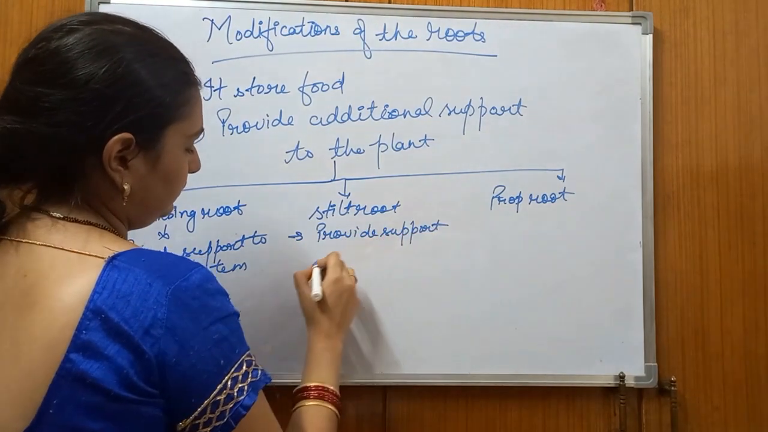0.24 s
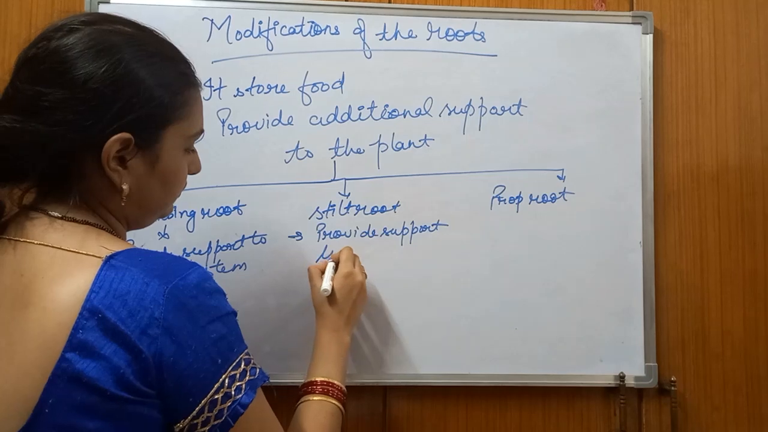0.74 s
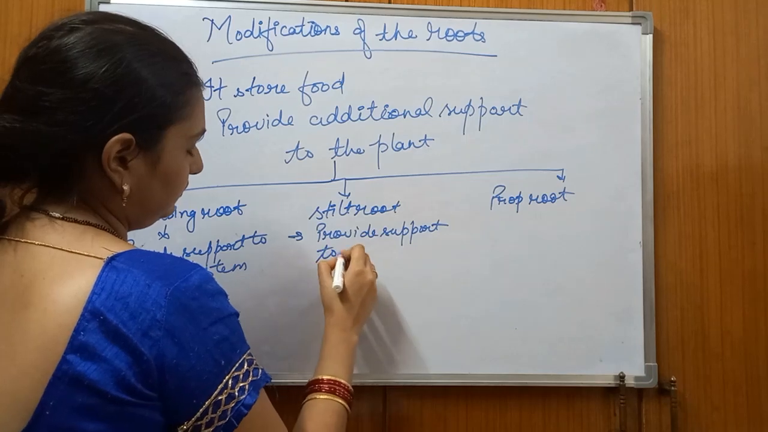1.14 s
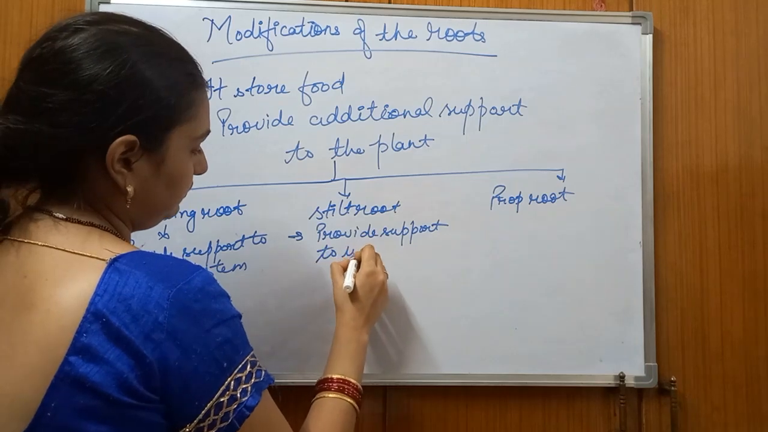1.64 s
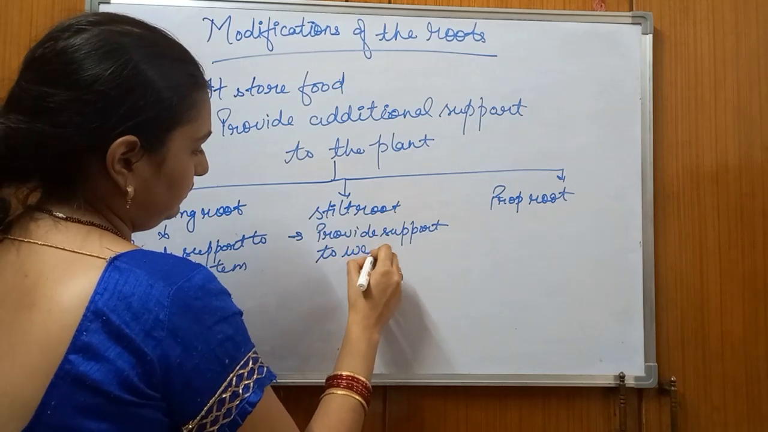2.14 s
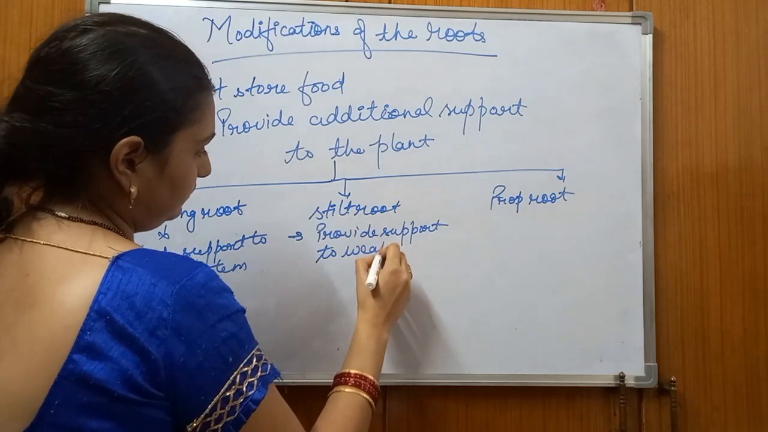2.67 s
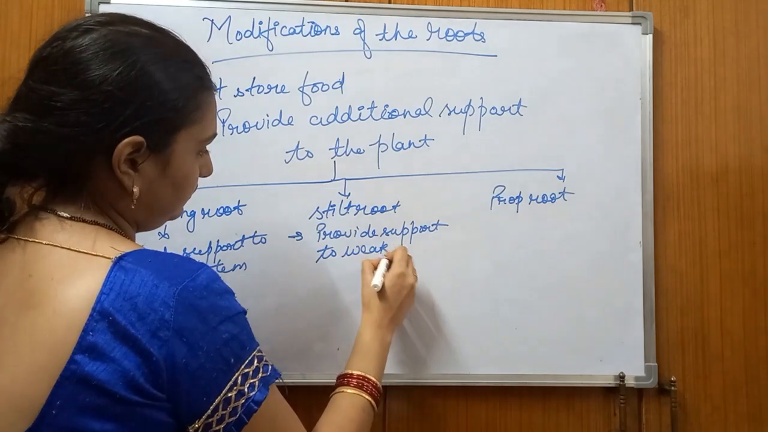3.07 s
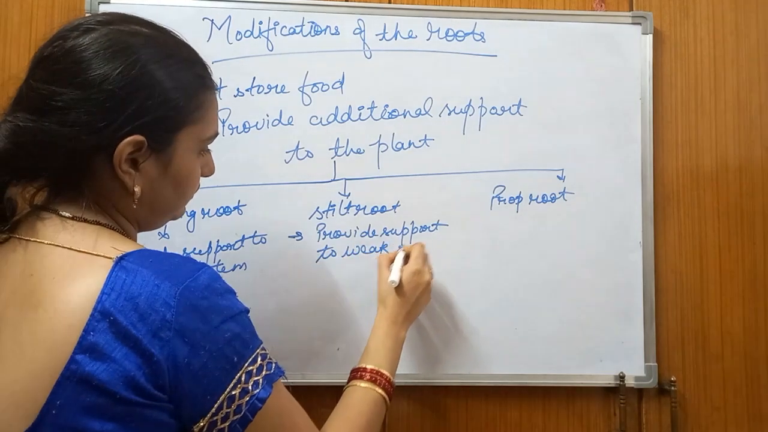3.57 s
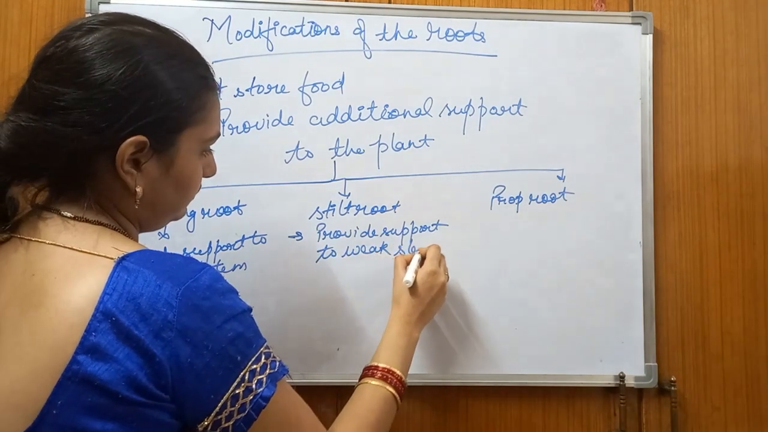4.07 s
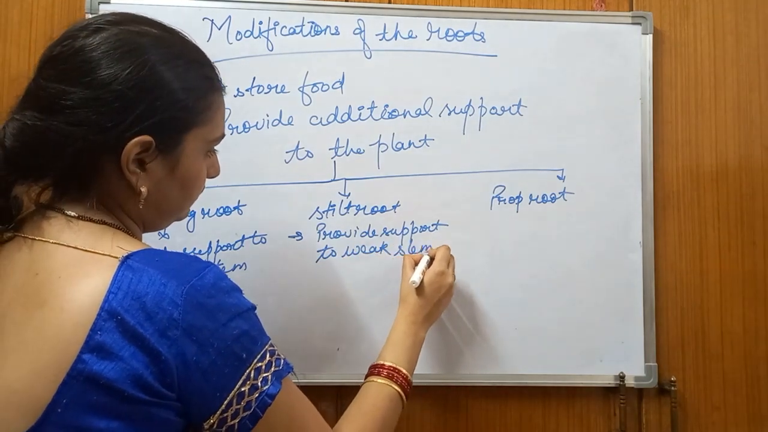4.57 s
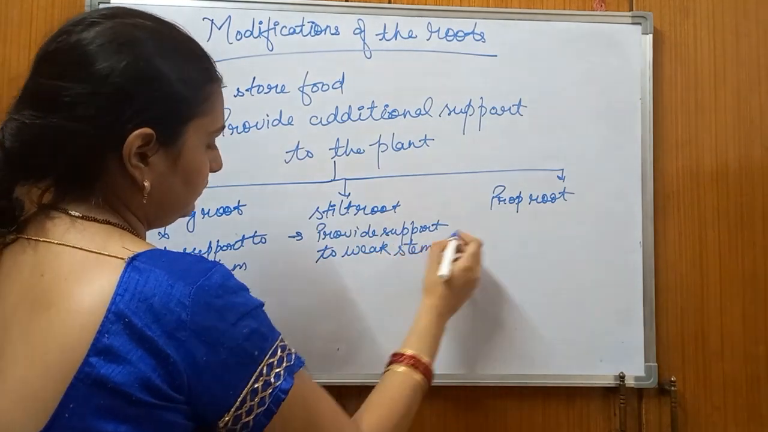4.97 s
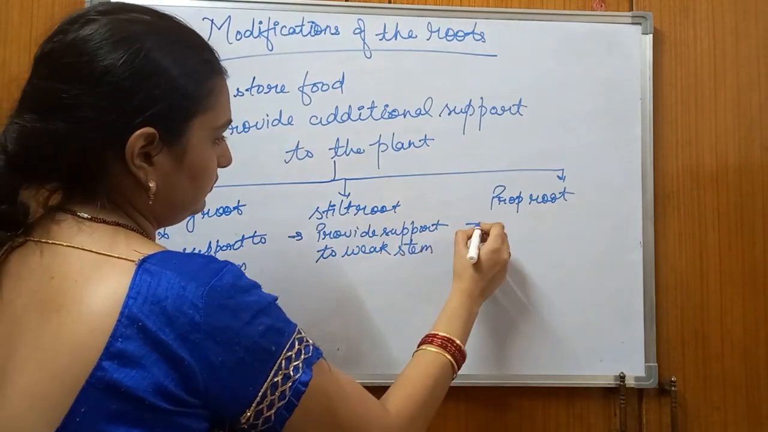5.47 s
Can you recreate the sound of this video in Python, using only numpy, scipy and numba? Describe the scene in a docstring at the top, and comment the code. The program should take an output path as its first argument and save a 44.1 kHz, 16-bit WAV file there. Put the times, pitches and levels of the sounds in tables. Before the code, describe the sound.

A felt-tip marker scratches short, hoarse, squeaky strokes on a whiteboard, with soft panel thumps, brief bangle clicks and a low fan drone.

```python
"""A felt marker writes a few words on a wall-hung whiteboard in a small bare room, the microphone close by.
The nib lands with a soft thump: a smooth push drives the panel's modes, frame returns and boom.
Then it scratches in tiny random slips that ring the nib, the barrel and the panel; a faint tone whines early on.
Bangles click as bursts of noise through resonances, and cloth rustles when the arm travels.
Behind it all a fan drones, shaped noise and wavering tones, over faint microphone hiss."""
import sys
import numpy as np
from scipy import signal
from scipy.fft import rfft, irfft
from scipy.io import wavfile
from scipy.ndimage import uniform_filter1d, map_coordinates
from numba import njit

SR = 44100
rng = np.random.default_rng(int(sys.argv[2]) if len(sys.argv) > 2 else 0)


def generate_wav(signal):
    """Clip the signal to [-1, 1] and save it as 16-bit WAV at the path in sys.argv[1]."""
    frames = np.transpose(np.atleast_2d(signal))
    scaled = np.clip(frames, -1, 1) * 32767
    pcm = np.round(scaled).astype(np.int16)
    wavfile.write(sys.argv[1], SR, pcm)


N = 252252
T = np.arange(N) / SR  # time [s]
FREQS = np.arange(N + 1) * SR / (2 * N)  # bins of the zero-padded spectrum [Hz]
TOP_HZ = 15850  # upper limit of the microphone


def undb(db):
    """Decibels to gain."""
    return np.exp(np.asarray(db) * (np.log(10) / 20))


def unit(x):
    """Scale to rms 1."""
    return x / np.sqrt(np.mean(x ** 2))


def noise():
    """White noise over the whole scene."""
    return rng.standard_normal(N)


def shape(x, response):
    """Filter by a frequency response."""
    return irfft(rfft(x, 2 * N) * response)[:N]


def colour(x, points):
    """Filter by a (frequency [Hz], level [dB]) spectrum, then scale to rms 1."""
    hz, db = np.transpose(points)
    curve_db = np.interp(np.log(FREQS + 1), np.log(hz), db)
    return unit(shape(x, undb(curve_db)))


def resonance(hz, width):
    """Response of one damped resonance, gain 1 at the centre."""
    return 1j * FREQS * width / (hz ** 2 - FREQS ** 2 + 1j * FREQS * width)


def ring(x, modes):
    """Pass through parallel (frequency [Hz], width [Hz], level [dB]) resonances."""
    return shape(x, sum(undb(db) * resonance(hz, width) for hz, width, db in modes))


@njit
def sweep(x, hz, width):
    """Band-pass whose centre moves: a state-variable filter retuned at every sample."""
    out, band_state, low_state = np.empty(len(x)), 0., 0.
    for i in range(len(x)):
        g, damping = np.tan(np.pi * hz[i] / SR), width / hz[i]
        band = (band_state + g * (x[i] - low_state)) / (1 + g * (g + damping))
        band_state = 2 * band - band_state
        low_state = low_state + 2 * g * band
        out[i] = damping * band
    return out


def walk(rate):
    """Smooth random wander of rms 1, with about `rate` fresh values a second."""
    step = int(SR / rate)
    held = np.repeat(rng.standard_normal(N // step + 1), step)
    return unit(uniform_filter1d(uniform_filter1d(held, step), step)[:N])


def slips(rate, spread_db):
    """Random tiny clicks of uneven size, on average `rate` a second, scaled to rms 1."""
    clicks = (rng.random(N) < rate / SR) * noise()
    return unit(clicks * undb(spread_db * np.clip(noise(), -2, 2)))


def fade(t60, start=0):
    """Exponential decay from a start time, cut off after twice its t60."""
    out, live = np.zeros(N), (T >= start) & (T < start + 2 * t60)
    out[live] = np.exp(-np.log(1000) * (T[live] - start) / t60)
    return out


def convolve(x, response):
    """Play a sound through the first second of an impulse response."""
    return signal.fftconvolve(x, response[:SR])[:N]


def wavering_sine(hz, depth, rate):
    """Sine whose pitch wanders by a share `depth`."""
    return np.sin(2 * np.pi * np.cumsum(hz * (1 + depth * walk(rate))) / SR)


def shimmer(x, rate, depth_db, count=22):
    """Overlapping bands swell and sink on their own as the nib turns; rms 1."""
    centres, spectrum = np.linspace(0, TOP_HZ, count), rfft(x)
    total = np.zeros(N)
    for pick in np.eye(count):
        band = irfft(spectrum * np.interp(FREQS[::2], centres, pick), N)
        total += band * undb(depth_db * np.tanh(walk(rate)))
    return unit(total)


# Sweeps of the pen, levels before the mix in writing(): (start [s], length [s],
# fastest point [share of length], scratch [dB], barrel ring [dB], panel drag [dB],
# nib resonance [Hz], squeak re scratch [dB])
PEN_SWEEPS = [ (0.307, 0.08, 0.33, -59.5, -73, -83, 9500, -11),
              (0.375, 0.074, .35, -59.5, -76, -77, 9900, -2), (0.47, 0.12, 0.28, -61, -73.5, -80, 9600, -8),
              (0.562, 0.056, 0.73, -60, -68, -84, 7810, -1),
              (0.610, 0.061, 0.68, -56, -66.5, -69, 9900, -1),
              (0.693, 0.068, .14, -58.5, -68, -70.5, 9700, -2),
              (0.764, 0.071, 0.88, -59, -57, -68.5, 9900, -3),
              (0.815, 0.06, 0.14, -57.5, -65.5, -61.5, 10250, 5),
              (1.015, 0.065, .28, -60.5, -69.5, -83, 9300, -14),
              (1.24, .110, 0.41, -60.5, -68, -72, 9700, -4),
              (1.372, 0.13, 0.28, -63, -69, -71.5, 8200, -14),
              (1.473, 0.099, .55, -62.5, -62, -63.5, 7880, -16),
              (1.585, 0.069, 0.22, -64, -65, -66, 7900, -7),
              (1.658, 0.14, 0.64, -58.5, -60, -65.5, 10300, -14),
              (1.906, 0.1, 0.68, -60, -64, -68, 11500, -7), (2.005, 0.13, 0.15, -61.5, -67, -69, 8100, -10),
              (2.133, 0.13, 0.36, -60.5, -66, -76, 10300, -15),
              (2.216, 0.1, 0.3, -60.5, -64, -71.5, 10300, -16),
              (2.323, .093, 0.35, -63, -63.5, -75, 10300, -20),
              (2.439, 0.093, 0.21, -67, -76, -70.5, 10400, -9),
              (2.505, 0.15, 0.6, -64, -66.5, -71.5, 12400, -5),
              (2.662, .080, .30, -63, -70.5, -73, 12000, -6),
              (2.801, 0.11, 0.71, -66.5, -74, -91, 12200, -21),
              (2.913, 0.087, 0.74, -62.5, -71, -90, 12200, -19),
              (3.029, 0.089, 0.51, -63, -66, -80, 10300, -26), (3.247, 0.15, 0.41, -64, -69, -66, 10100, 0),
              (3.385, 0.18, 0.66, -65.5, -71, -72, 11900, -7),
              (3.708, 0.16, 0.49, -60.5, -70.5, -64.5, 12040, -3),
              (3.815, 0.13, 0.79, -65, -64, -62, 11000, -11),
              (3.943, 0.093, 0.18, -65, -67, -64.5, 12980, -8),
              (4.078, 0.078, 0.52, -62.5, -73, -67.5, 11500, -13),
              (4.165, 0.082, 0.38, -63.5, -72, -64, 12600, -2),
              (4.268, 0.1, 0.38, -61, -66, -66, 12000, -4), (4.372, 0.095, 0.41, -65, -72.5, -70, 12400, 2),
              (4.493, 0.11, .18, -58.5, -66, -64.5, 12700, 4.5),
              (4.57, 0.08, 0.2, -60.5, -69, -64, 13200, 3),
              (4.846, 0.058, 0.4, -59.5, -64.5, -67, 9400, -26),
              (5.437, 0.13, 0.34, -66, -74.5, -90, 10600, -14),
              (5.545, 0.069, 0.76, -67.5, -72.5, -80, 10500, -14),
              (5.641, .115, 0.53, -64, -70, -80, 11800, -5), ]
# scratch at the two ends of an even sweep re its fastest point; an early peak starts harder
SLOW_START_DB, SLOW_END_DB = -5.5, -12
BARREL_FOLLOW, DRAG_FOLLOW = 0.55, 0.49  # dB gained by barrel and panel per dB of scratch


def hand(edge_s=0.0048, turn_s=0.018):
    """Each sweep speeds up and slows down in one arch; scratch, barrel and drag follow that speed."""
    gains, posture = np.zeros((3, N)), np.zeros((3, N))
    posture[0] = PEN_SWEEPS[0][6]
    for start, length, fastest, scratch_db, barrel_db, drag_db, nib_hz, squeak_db in PEN_SWEEPS:
        first, last = int(start * SR), min(int((start + length) * SR), N)
        along = (T[first:last] - start) / length
        fastest = np.clip(fastest, .05, .95)
        arch = np.sin(np.pi * np.interp(along, [0, fastest, 1], [0, .5, 1]))
        end_db = np.where(along < fastest, 2 * fastest * SLOW_START_DB, SLOW_END_DB)
        speed_db = (1 - arch) * end_db
        levels = [scratch_db + speed_db,
                  barrel_db + BARREL_FOLLOW * speed_db,
                  drag_db + DRAG_FOLLOW * speed_db]
        gains[:, first:last] = undb(levels)
        # the nib keeps its resonance and squeak until the next sweep
        posture[0, first:], posture[1, first:] = nib_hz, squeak_db
        posture[2, first:last] = along - .5
    gains = uniform_filter1d(gains, int(edge_s * SR) + 1)
    posture = uniform_filter1d(posture, int(turn_s * SR) + 1)
    return (*gains, *posture)


# Colour of felt on the board, also of the landing ticks: (frequency [Hz], relative density [dB])
FELT_COLOUR = [(1500, -9), (3000, -22), (4500, -14.5), (5700, -6.5), (6400, -6), (7400, -1), (8500, -1),
               (10200, 1), (11500, -2), (13000, -1), (14500, -3), (16000, -10)]
# Marker barrel: (ratio to its main resonance, width [Hz], relative level [dB])
BARREL_MODES = [(.665, 170, -5.5), (0.737, 171, -4), (.87, 900, -9), (0.999, 338, 3), (1.15, 302, -14),
                (1.47, 380, 0.5)]
# Main barrel resonance as the grip shifts: (time [s], frequency [Hz])
GRIP_TUNING = [(.3, 4750), (.85, 4760), (1.3, 5040), (2.3, 5010), (3.8, 4940), (5.7, 5050)]
# Panel under the dragging nib: (frequency [Hz], width [Hz], relative level [dB])
DRAG_MODES = [(905, 650, 3), (1574, 290, 2.5), (1627, 170, 0), (2230, 144, -2.5), (2460, 84, -12),
              (3310, 93, -3.5), (3780, 210, -8.5)]
# Panel shaken by the writing hand: (frequency [Hz], relative density [dB])
HAND_RUMBLE = [(30, -10), (50, -2), (200, 0), (300, -6), (550, -12), (800, -34.5)]


def writing():
    """Felt fibres catch and slip; the nib squeaks hoarsely, the barrel and the panel ring along."""
    scratch_gain, barrel_gain, drag_gain, nib_hz, squeak_db, along = hand()
    scratch = shimmer(colour(slips(rate=7000, spread_db=0), FELT_COLOUR), rate=16, depth_db=6.5)
    nib_hz = np.clip(nib_hz * (1 + 0.023 * walk(40)), 100, SR / 2.3)
    nib = sweep(slips(rate=16000, spread_db=7.5), nib_hz, 2600.0)
    nib = unit(sweep(nib, nib_hz, 3800.))
    # the harder the nib squeaks, the less is left for plain scratching
    squeak = undb(squeak_db)
    tip = (scratch + squeak * nib) / np.sqrt(1 + squeak ** 2)
    # the fingers shift and damp the barrel's resonances from moment to moment
    force = slips(rate=9000, spread_db=-0.5)
    tuning_hz = np.interp(T, *np.transpose(GRIP_TUNING))
    barrel_hz = tuning_hz * (1 + 0.012 * along + 0.012 * walk(14))  # rises during a sweep
    barrel = np.zeros(N)
    for ratio, width, db in BARREL_MODES:
        damping = undb(db + 2.9 * np.tanh(walk(21.57)))
        barrel += damping * sweep(force, ratio * barrel_hz, float(width))
    barrel = colour(barrel, [(2000, -17), (3200, -1.5), (5400, -0.5), (7500, -8)])
    drag = colour(ring(slips(rate=7100, spread_db=3.5), DRAG_MODES), [(4000, 4), (7000, -6)])
    drag = shimmer(drag, rate=14, depth_db=4.0)
    rumble = colour(noise(), HAND_RUMBLE)
    sound = scratch_gain * (undb(-0.1) * tip + undb(-0.5) * rumble)
    sound += undb(-1.8) * drag_gain * drag
    sound += undb(-2.0) * barrel_gain * barrel
    # the board mirrors the sound along a path that changes as the hand moves
    mirror_s = 0.000897 + 0.00012 * walk(7)
    sound = sound + 0.32 * map_coordinates(sound, [(T - mirror_s) * SR], order=3)
    # the pressure of the hand is never quite even
    return sound * undb(0.72 * walk(110) + 1.0 * walk(40))


# The nib lands or presses: (peak of the push [s], push [dB], contact time scale [ms], tick [dB])
LANDINGS = [(0.2848, -31, 3.05, -67), (0.9811, -28, 2.37, -61), (1.2227, -30.5, 3.25, -70),
            (1.411, -46, 6.4, -80), (1.574, -43, 6.3, -82), (1.659, -45, 4.4, -80), (1.915, -38, 4.6, -69),
            (2.670, -47.5, 2.9, -75), (3.251, -40, 6.9, -77), (3.286, -54, 3.4, -80),
            (3.6745, -25.5, 3.1, -63), (4.184, -43, 11, -80), (4.275, -45.5, 5.1, -75),
            (4.496, -39, 4.8, -70), (4.8110, -20.5, 1.32, -67), (5.3904, -35.5, 5.5, -68),
            (5.448, -38, 4.8, -82)]
# Panel modes: (frequency [Hz], relative level [dB], t60 [s])
PANEL_MODES = [(46.4, -8.5, 0.8), (68.8, -9, 0.27), (103, -18, 0.32), (123.3, 2.5, 0.38),
               (130.4, 0.5, 0.48), (156, -12.5, 0.25), (197.5, -10, .4), (241.4, 5.5, 0.52),
               (261, -5, 0.31), (281, -7, 0.86), (318, -10.5, 0.28), (422, -8.5, 0.17), (484, 10.5, 0.083),
               (508, -2.5, 0.35), (686, 3, 0.19), (706, 4.5, 0.18), (918, 13, 0.1)]
# Bending waves come back from the frame: (delay [s], relative level [dB])
FRAME_RETURNS = [(.0115, -21), (0.026, -2.5), (0.051, -3), (.078, -12)]
# Room boom of the panel: (frequency [Hz], relative density [dB])
PANEL_BOOM = [(35, -13.5), (70, -4), (125, 4), (165, -2.5), (260, 3), (380, -10), (490, -6), (620, -12.5),
              (950, -5.5), (1700, 0), (4000, -42)]
# Short clatter of the frame: (frequency [Hz], relative density [dB])
FRAME_CLATTER = [(200, -15), (400, -1.5), (490, 12), (590, -11), (700, 2), (850, 0), (1000, -9), (1250, -2),
                 (1750, 10.5), (3000, -5)]


def taps():
    """Each landing pushes the panel: a short thump, its returns from the frame, the modes and the room's boom."""
    push, tick = np.zeros(N), np.zeros(N)
    for s, db, contact_ms, tick_db in LANDINGS:
        phase = np.clip(np.pi * (T - s) / (contact_ms / 1000), -20, 20)
        push -= undb(db) / np.cosh(phase) ** 2
        tick += undb(tick_db) * fade(0.061, s - .001)
    # slow motion of the panel moves little air, so the thump lacks deep bass
    thump = shape(push, np.abs(resonance(340, 660)))
    returns = sum(undb(db) * np.interp(T - delay, T, push) for delay, db in FRAME_RETURNS)
    returns = shape(returns, np.abs(resonance(245, 190)))
    modes = np.zeros(N)
    for k, (hz, db, t60) in enumerate(PANEL_MODES):
        sign = (-1) ** k  # neighbouring modes start in opposite directions
        modes += sign * undb(db) * np.sin(2 * np.pi * hz * T) * fade(t60)
    boom = colour(noise(), PANEL_BOOM) * fade(0.66) * (1 - fade(0.13))  # builds up, then decays
    clatter = colour(noise(), FRAME_CLATTER) * fade(0.052, 0.0056)
    body = convolve(push, undb(-53) * modes + undb(-43.5) * boom + undb(-24) * clatter)
    ticks = tick * colour(noise(), FELT_COLOUR)
    return undb(1.5) * thump + undb(-0.5) * returns + body + ticks


def whine(start_s=0.399, length_s=0.17, edge_s=0.016, hz=515, level_db=-61.5):
    """A faint wavering tone swells and fades during the first letters."""
    to_edge = np.minimum(T - start_s, start_s + length_s - T)
    swell = np.clip(to_edge / edge_s, 0, 1)
    return swell * undb(level_db + 2 * walk(25.4)) * wavering_sine(hz, 0.0077, 29.2)


# Bangles knock together, level before their resonances: (time [s], level [dB])
BANGLE_KNOCKS = [(0.1336, -57), (0.1360, -53.5), (0.141, -68), (0.189, -54), (5.162, -73), (5.167, -41),
                 (5.169, -41.5), (5.1745, -56)]
# Bangle resonances: (frequency [Hz], width [Hz], relative level [dB])
BANGLE_MODES = [(5330, 450, -12), (9250, 630, -15), (10400, 600, -5), (11350, 600, -2.5), (13300, 600, -6),
                (14400, 740, 4)]


def bangles():
    """Brief decaying noise bursts knock the bangles and ring their bright resonances."""
    knocks = sum(undb(db) * fade(0.013, s) for s, db in BANGLE_KNOCKS) * noise()
    # small hard rings radiate no lows
    knocks = signal.sosfilt(signal.butter(3, 4300, "high", fs=SR, output="sos"), knocks)
    return undb(7.5) * ring(knocks, BANGLE_MODES)


# The arm travels: (fastest moment [s], swell scale [s], fade scale [s], level [dB])
ARM_TRAVEL = [(.05, .15, 0.15, -72.5), (.137, .018, 0.023, -66.5), (5.09, 0.16, 0.085, -76)]


def sleeve():
    """Cloth rustles in uneven tiny slips that swell and fade with the travelling arm."""
    cloth = colour(slips(rate=5000, spread_db=6),
                   [(1500, 0), (4200, -9.0), (7000, -6.0), (11000, -3), (15500, -11.0)])
    travel = np.zeros(N)
    for s, swell_s, fade_s, db in ARM_TRAVEL:
        travel += undb(db) * np.exp(-((T - s) / np.where(T < s, swell_s, fade_s)) ** 2)
    return travel * cloth


# Fan and room: (frequency [Hz], relative density [dB])
FAN_RUSH = [(22, -42), (42, -5.5), (64, -6.5), (82, -11), (105, -2.5), (150, -3), (190, -4.5), (230, -15.5),
            (280, -6), (350, -12.5), (430, -12), (620, -23.5), (780, -21), (950, -16.5), (1200, -28),
            (1800, -32), (2700, -43.5)]
# Fan tones: (frequency [Hz], level [dB]), both the centres of a slow wander
FAN_TONES = [(69.5, -59.5), (124, -72.5), (199, -69), (241, -71.5)]
# Microphone hiss: (frequency [Hz], relative density [dB])
MICROPHONE_HISS = [(2000, -15), (3900, -11), (5000, -12), (5700, 0.5), (7000, 1), (11000, 3.5), (12200, -7),
                   (16000, -4)]


def background():
    """A fan's low rush and wavering tones, over faint hiss."""
    rush = colour(noise(), FAN_RUSH) * undb(-56.0 + 1.0 * walk(4.59))
    hum = sum(undb(db + 1.15 * walk(6)) * unit(wavering_sine(hz, .012, 8)) for hz, db in FAN_TONES)
    hiss = undb(-77.0 + 0.81 * walk(30)) * colour(noise(), MICROPHONE_HISS)
    return rush + hum + hiss


def room(x, t60=0.26):
    """Diffuse tail of a small bare room: decaying noise of energy 1."""
    tail = noise() * fade(t60, 0.0018)
    return convolve(x, tail / np.sqrt(np.sum(tail ** 2)))


def scene():
    """Everything is nearly central; the lows lean a little to the left and the background is slightly wider."""
    near = writing() + bangles() + sleeve()
    mid = near + undb(-7.0) * room(near) + taps() + whine() + background()
    lean = shape(mid, 0.045 * resonance(420, 2200))
    side = lean + undb(-43) * room(mid, t60=0.047) + undb(-19.5) * background()
    return np.array([mid + side, mid - side])


def record(dry):
    """The microphone cuts the deepest rumble and the top."""
    dry = signal.sosfilt(signal.butter(2, 30, "high", fs=SR, output="sos"), dry)
    return signal.sosfilt(signal.ellip(10, .2, 70, TOP_HZ, fs=SR, output="sos"), dry)


dry = scene()
out = record(dry)
generate_wav(out)
```